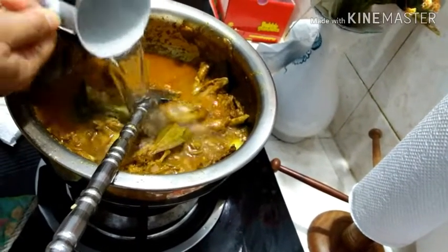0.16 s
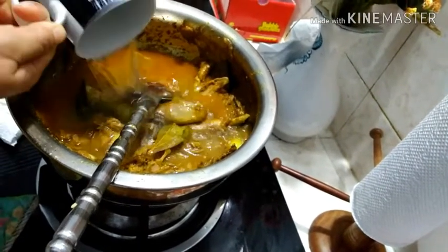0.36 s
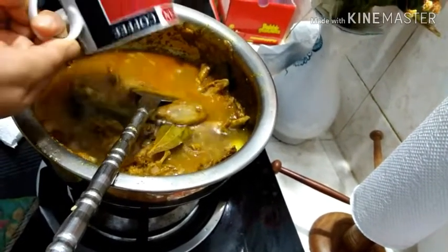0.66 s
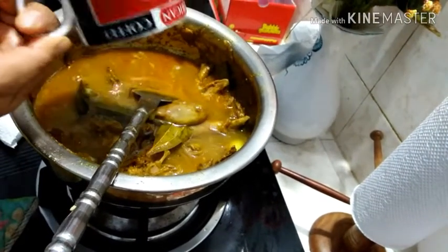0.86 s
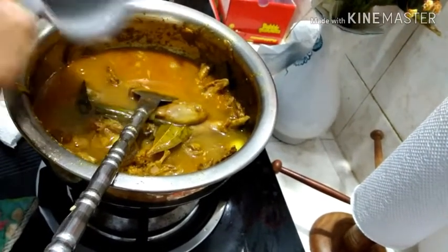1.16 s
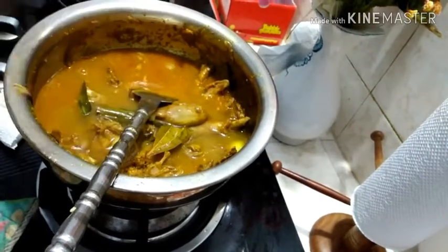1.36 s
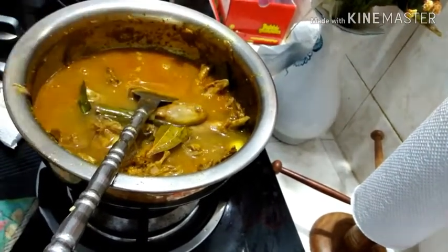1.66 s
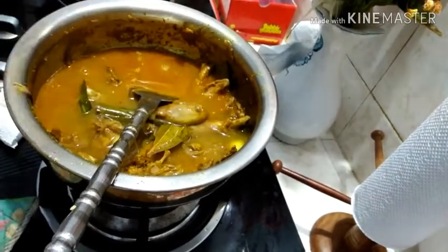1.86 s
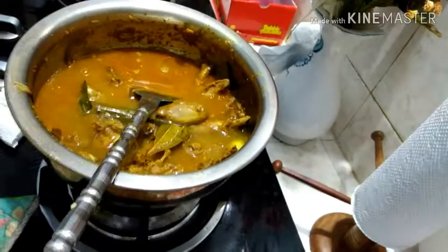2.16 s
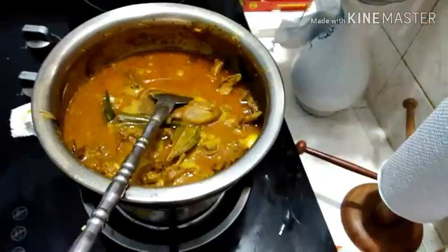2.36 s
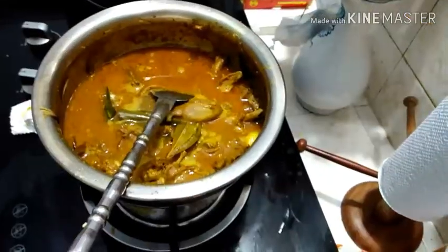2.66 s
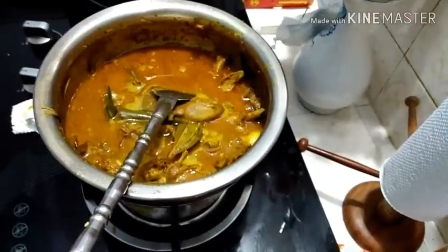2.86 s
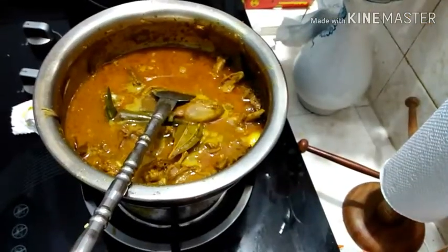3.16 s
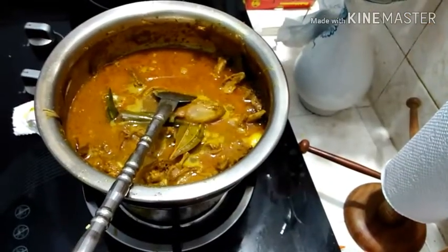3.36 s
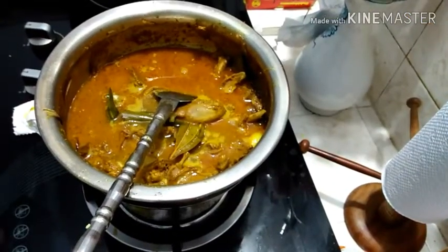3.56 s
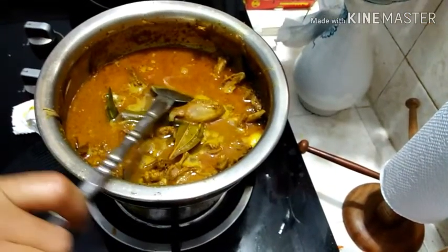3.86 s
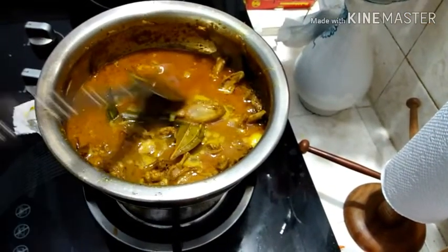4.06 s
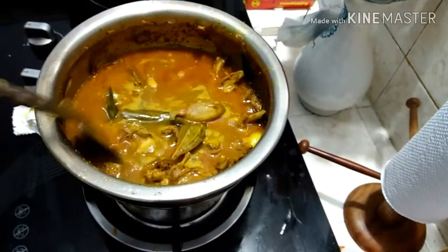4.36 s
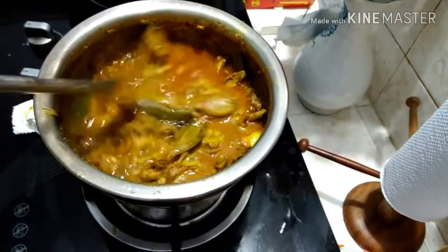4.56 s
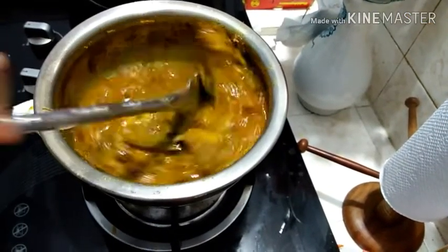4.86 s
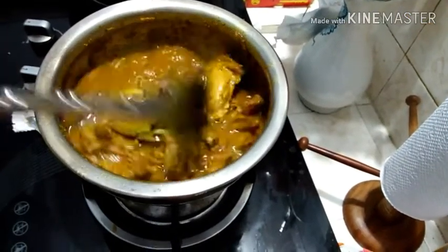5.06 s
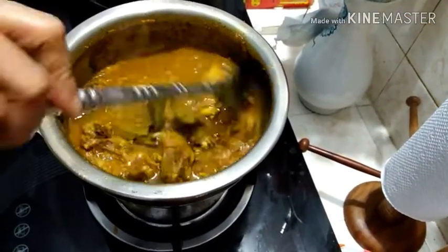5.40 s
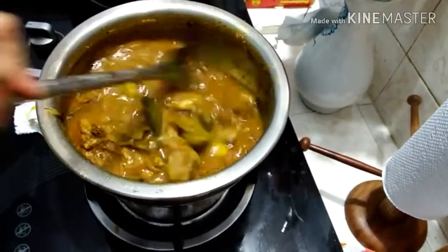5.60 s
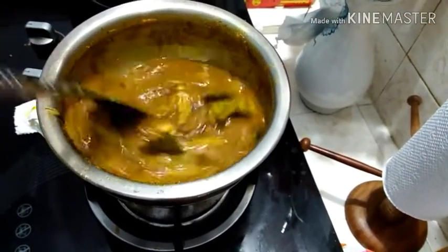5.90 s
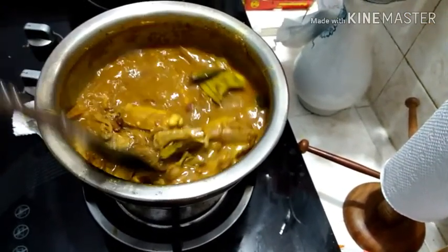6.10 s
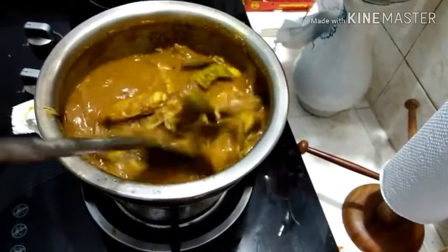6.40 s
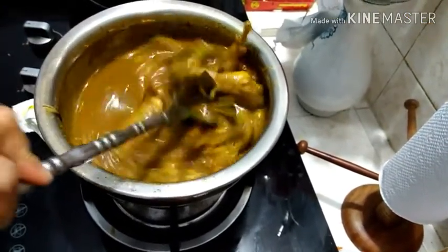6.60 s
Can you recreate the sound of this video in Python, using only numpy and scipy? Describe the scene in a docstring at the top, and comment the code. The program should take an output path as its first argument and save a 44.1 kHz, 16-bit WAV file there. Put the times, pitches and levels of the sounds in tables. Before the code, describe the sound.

Close by a stove in a tiled kitchen with a short dense echo. From 0 to about 1.2 s water pours into a full pot, a swarm of small ringing bubbles with a few bright plops near 0.1 and 0.3 s, thinning out. Underneath, a soft burner rush with hollow tones and a fluttering low drone, strongest around 2 s, plus a faint simmer. Dry, crisp bristle swishes run throughout, with sharper flicks near 0.5, 1.8, 2.6 and 3.8 s. At 4.1 s the spatula scrapes faintly; at 4.7 s it knocks hard, with a bright crack and hollow boom. Dull wet shoves follow, notably at 5.1 s. At 5.53 s comes the loudest event, a rattling steel clang with a low thump and a shimmering ring of under half a second. Another shove at 5.8 s, a bubble at 6.1 s, paired flicks at 6.2 s, and a lighter metallic knock at 6.4 s.

```python
"""A long metal spatula shoves the meat about in a steel pot of curry, knocks on it twice and clangs once.
The blade excites the filled pot; blows add a bright crack, a short ring and a shimmer from the wall.
Before most of this, a mug of hot water is poured in: swarms of ringing air bubbles.
The burner is shaped noise. Ticking bristles make a dry swish that comes and goes, like a stiff broom.
A dense echo tail places the pot in a tiled kitchen."""
import sys
import numpy as np
from scipy import signal
from scipy.fft import rfft, irfft
from scipy.io import wavfile

SR = 44100
rng = np.random.default_rng(int(sys.argv[2]) if len(sys.argv) > 2 else 0)


def transcribe(signal):
    """Save signal, clipped to [-1, 1], as a 16-bit WAV file at the path in sys.argv[1]."""
    frames = np.atleast_2d(signal).T
    limited = np.clip(frames, -1, 1)
    pcm = np.round(limited * 32767).astype(np.int16)
    wavfile.write(sys.argv[1], SR, pcm)


N = 297234
TIME = np.arange(N) / SR


def amp(db):
    """Decibels to gain."""
    return 10 ** (np.asarray(db) / 20)


def evened(x):
    """Scales x to an average strength (rms) of one."""
    return x / np.sqrt(np.mean(x ** 2) + 1e-20)


def read(points, hz):
    """Reads a table on a logarithmic frequency axis."""
    f, value = np.transpose(points)
    return np.interp(np.log(hz + 1), np.log(f + 1), value)


def curve(rows):
    """Joins (time, value) rows by straight lines."""
    return np.interp(TIME, *np.transpose(rows))


def add(mix, s, sound):
    """Lays a sound into the mix at time s."""
    part = mix[max(round(s * SR), 0):][:len(sound)]
    part += sound[:len(part)]


def colour(x, spectrum):
    """Makes some pitches of x stronger than others, then sets its rms to one."""
    hz = np.fft.rfftfreq(len(x), 1 / SR)
    gain = amp(read(spectrum, hz))
    return evened(irfft(rfft(x) * gain, len(x)))


def resonate(x, peaks):
    """Passes x through resonances, then sets its rms to one; only differences between their dB count."""
    hz = np.fft.rfftfreq(len(x), 1 / SR)
    # each gain falls to half of its peak one width away from its centre
    gain = sum(amp(db) / (1 + ((hz - f) / width) ** 2) for f, width, db in peaks)
    return evened(irfft(rfft(x) * gain, len(x)))


def grains(per_s, spread_db):
    """Random tiny impacts, a few of them large."""
    size = amp(spread_db * np.minimum(rng.exponential(1, N), 4))
    signed = size * rng.choice([-1, 1], N)
    return evened(signed * (rng.random(N) < per_s / SR))


def flutter(rate_hz, depth_db):
    """A gain that wanders at random, around rate_hz and by depth_db (rms)."""
    wander = resonate(rng.standard_normal(N), [(rate_hz, rate_hz / 2, 0)])
    return amp(depth_db * wander)


def burst(s, rise, fade):
    """An envelope that swells at time s and dies away; rise and fade are time constants in s."""
    age = np.maximum(TIME - s, 0)
    return (1 - np.exp(-age / rise)) * np.exp(-age / fade)


def dying(x, t60s):
    """Lets each band of x die at its own speed; t60 is the time to fall by 60 dB."""
    hz, t, bands = signal.stft(x, SR, nperseg=256)
    decay = amp(-60 * t / read(t60s, hz)[:, None])
    return signal.istft(bands * decay, SR, nperseg=256)[1][:len(x)]


def ring(modes, rise, beat_share=0):
    """Many pitches ring and die away, starting near an rms of one; each may waver in strength."""
    t = TIME[:SR]
    hz, db, t60 = np.transpose(modes)[:, :, None]
    # each pitch swells and sinks 12 to 30 times a second, as if beating against a close twin
    beats = 1 + beat_share * np.cos(2 * np.pi * rng.uniform(12, 30, hz.shape) * t)
    waves = np.sin(2 * np.pi * (hz * t + rng.random(hz.shape)))
    partials = beats * amp(db - 60 * t / t60) * waves
    return partials.sum(0) * (1 - np.exp(-t / rise)) / np.sqrt(np.sum(amp(db) ** 2) / 2)


# how long the room's echo lasts: f/Hz, t60/s
ROOM_T60 = [(150, 0.36), (1000, 0.51), (4000, 0.53), (9000, 0.31), (14000, 0.11)]


def kitchen(x, wet_db):
    """Tiles throw back a dense tail, which starts after 5 ms."""
    fade_in = np.clip(TIME[:SR] / 0.005 - 1, 0, 1)
    tail = dying(rng.standard_normal(SR), ROOM_T60) * fade_in
    return x + amp(wet_db) * signal.fftconvolve(x, tail / np.linalg.norm(tail))[:N]


# level of the soft rush and of the hollow tones: t/s, level/dB
RUSH_AND_HOLLOW_LEVEL = [(0, -2), (1.4, 5), (2.3, 4.5), (2.7, -4.5), (3.3, 1), (4.5, 3.5), (5.4, -0.5),
                         (6.73, -0.5)]
# spectrum of the rush: f/Hz, level/dB per Hz
RUSH_SPECTRUM = [(25, -5), (55, -15), (110, 4), (200, 1.5), (370, -35), (520, -14), (850, -21), (1500, -4),
                 (2300, -9), (2950, -12.5), (4200, -16), (6000, -9), (8500, 0), (14000, -15.5)]
# air resonances round the pot: f/Hz, width/Hz, level/dB
HOLLOW_TONES = [(271.4, 7.1, 6), (296, 30, -2), (421, 14, -2), (474, 6, -1), (600, 13, 0), (817, 220, -0.5),
                (2184, 360, -3)]
# the flame's low drone, before its flutter: t/s, level/dB
DRONE_LEVEL = [(0, -67.5), (1.0, -57), (1.8, -51.5), (2.35, -49), (2.65, -62.5), (4.5, -59), (5.6, -67),
               (6.73, -65.5)]
# the flame's low rumble, before its flutter: t/s, level/dB
RUMBLE_LEVEL = [(0, -66.5), (1.8, -69.5), (2.3, -57.5), (2.7, -63.5), (5.7, -63), (6.1, -68)]


def burner(rush_db=-60, hollow_db=-63, rush_share=0.5):
    """The flame rushes softly and stirs the air round the pot; its drone and rumble flutter."""
    level_db = curve(RUSH_AND_HOLLOW_LEVEL)
    # the rush follows only a share of this level curve in dB
    rush = amp(rush_db + rush_share * level_db) * colour(rng.standard_normal(N), RUSH_SPECTRUM)
    hollows = amp(hollow_db + level_db) * resonate(rng.standard_normal(N), HOLLOW_TONES)
    drone = amp(curve(DRONE_LEVEL)) * resonate(rng.standard_normal(N), [(135.2, 8.5, 0)])
    low_air = resonate(rng.standard_normal(N), [(69.3, 9.6, 22), (98, 11, 12.0)])
    rumble = amp(curve(RUMBLE_LEVEL)) * low_air
    return rush + hollows + (rumble + drone) * flutter(rate_hz=6.7, depth_db=3.0)


def stroke(start, length, attack, release_db_per_s):
    """An envelope that rises, holds until its length is over and dies away."""
    age = TIME - start
    return np.clip(age / attack, 0, 1) * amp(-release_db_per_s * np.maximum(age - length, 0))


# light drags of the broom: start t/s, length/s, level at the start/dB, level at the end/dB
LIGHT_DRAGS = [(-.05, 0.44, -43, -41), (.8, .13, -51, -55), (0.943, 0.7, -49, -60),
               (1.51, 0.19, -45.5, -38.5), (2.186, 0.34, -51.5, -42), (2.835, 0.29, -51, -44.5),
               (3.11, 0.21, -55, -49.5), (3.36, 0.34, -43.5, -42), (4.081, 0.71, -46, -52),
               (4.72, 0.3, -36, -40), (5.271, 0.23, -53, -45), (5.732, 0.32, -46, -38),
               (6.063, 0.14, -52, -43), (6.426, 0.36, -49, -49.5)]
DRAG_ATTACK_S, DRAG_RELEASE_DB_PER_S = 0.022, 103
# quick flicks, many of them in pairs: t/s at full force, level/dB
QUICK_FLICKS = [(0.505, -32), (0.602, -32.5), (1.66, -39), (1.773, -34), (1.868, -36), (2.58, -31),
                (2.626, -29), (3.612, -34.5), (3.76, -31), (3.806, -29), (5.026, -29), (5.915, -41.5),
                (6.205, -32.5), (6.254, -32)]
FLICK_ATTACK_S, FLICK_HOLD_S, FLICK_RELEASE_DB_PER_S = 0.027, 0.0027, 151


def sweeping():
    """Level of the broom in dB: slow drags that press harder or ease off, and quick flicks."""
    power = np.zeros(N) + 1e-9
    for s, length, first_db, last_db in LIGHT_DRAGS:
        pressure = amp(curve([(s, first_db), (s + length, last_db)]))
        drag = stroke(s, length, DRAG_ATTACK_S, DRAG_RELEASE_DB_PER_S)
        power += (pressure * drag) ** 2
    for s, db in QUICK_FLICKS:
        flick = stroke(s - FLICK_ATTACK_S, FLICK_ATTACK_S + FLICK_HOLD_S,
                       FLICK_ATTACK_S, FLICK_RELEASE_DB_PER_S)
        power += (amp(db) * flick) ** 2
    return 10 * np.log10(power)


# spectrum of bristles dragged lightly: f/Hz, level/dB per Hz
DRAG_SPECTRUM = [(2000, -57), (2900, -21), (3450, -12), (4150, -27), (4900, -13.5), (6400, -12), (7500, -1),
                 (8450, 7), (9600, 0.5), (11000, -2), (12700, -10), (14200, -8.5)]
# spectrum of bristles flicked hard, also used for the snaps: f/Hz, level/dB per Hz
FLICK_SPECTRUM = [(500, -95), (1000, -25), (1270, -12), (1650, -29.5), (2700, -16), (3000, -25),
                  (3450, -12.5), (4100, -30.5), (4900, -13), (6400, -11.5), (8400, 1), (9800, -3),
                  (11100, 1.5), (14000, -9)]


def broom(light_db=-49, hard_db=-32):
    """Bristles tick unevenly over the floor; the harder the stroke, the wider its spectrum."""
    level_db = sweeping()
    # 0 is a light stroke, 1 a hard one
    force = np.clip((level_db - light_db) / (hard_db - light_db), 0, 1)
    light = colour(grains(per_s=14000, spread_db=3.5), DRAG_SPECTRUM)
    light = light * flutter(rate_hz=13, depth_db=2.0)
    hard = colour(grains(per_s=20000, spread_db=3.0), FLICK_SPECTRUM)
    return amp(level_db) * (np.sqrt(1 - force) * light + np.sqrt(force) * hard)


# bristles landing or snapping: t/s, level/dB
BRISTLE_SNAPS = [(.071, -33), (0.163, -27), (.184, -32), (.494, -31), (0.8167, -38), (1.526, -39),
                 (1.856, -27), (2.446, -33), (2.573, -26), (3.368, -33), (3.378, -30), (3.612, -31),
                 (6.190, -31)]


def snaps():
    """Single stiff bristles slap the floor: very short bursts of noise."""
    slaps = sum(amp(db) * burst(s, rise=.0002, fade=.004) for s, db in BRISTLE_SNAPS)
    return slaps * colour(rng.standard_normal(N), FLICK_SPECTRUM)


def bubble(hz, t60, glide=0.011):
    """A trapped pocket of air rings, rising a little in pitch as it nears the surface."""
    t = TIME[:SR // 8]
    wave = np.sin(2 * np.pi * hz * t * (1 + glide * t / t60))
    return (1 - np.exp(-hz * t)) * amp(-60 * t / t60) * wave


def swarm(centre_hz, spread, per_s, t60):
    """Many bubbles with pitches scattered round a centre, at random times; rms of one."""
    pitches = centre_hz * np.exp(spread * np.linspace(-1, 1, num=32))
    out = np.zeros(N)
    for hz in pitches:
        pop = bubble(hz, t60)
        for s, size, sign in rng.random((round(per_s * N / SR / len(pitches)), 3)):
            # the power makes a few bubbles much louder than the rest
            strength = np.sign(sign - .5) * (size + .02) ** -.4
            add(out, s * N / SR, strength * pop)
    return evened(out)


# the stream from the mug: t/s, level/dB
POUR_LEVEL = [(0, -55), (.33, -54), (.45, -59), (.95, -68), (1.3, -100)]
# single air bubbles that stand out: t/s, level/dB, f/Hz, t60/s
SINGLE_BUBBLES = [(.031, -40, 2980, 0.024), (0.068, -42, 3030, 0.054), (.123, -33, 902, 0.039),
                  (0.167, -36, 3090, .03), (.184, -41, 2960, .03), (.226, -42, 900, 0.025),
                  (0.281, -26, 2400, 0.016), (0.288, -31, 2670, 0.026), (.346, -41.5, 750, .03),
                  (5.078, -42, 1830, 0.018), (6.11, -32.5, 1360, 0.017)]


def water(large_db=-4, simmer_db=-62):
    """The stream whips up small and large bubbles, a few standing out; the gravy simmers throughout."""
    small = swarm(2750, spread=.14, per_s=320, t60=.016)
    large = swarm(1100, spread=.5, per_s=120, t60=.02)
    simmer = swarm(1300, spread=.62, per_s=600, t60=.03)
    stream = amp(curve(POUR_LEVEL)) * evened(small + amp(large_db) * large)
    out = stream + amp(simmer_db) * simmer
    for s, db, hz, t60 in SINGLE_BUBBLES:
        add(out, s, amp(db) * bubble(hz, t60))
    return out


# hard blows set the whole wall ringing: t/s, level/dB
WALL_CLANGS = [(4.719, -53), (5.537, -11), (6.421, -56)]
# ringing pitches of the pot's wall: f/Hz, level/dB, t60/s
WALL_MODES = [(2042, -14, .42), (2115, -17, .45), (2226, -11, .45), (2999, -3.5, .33), (3020, -8, .35),
              (3130, -9, .35), (3160, -8, .32), (3535, -7, .18), (3560, 2, .26), (3816, -20, .48),
              (4059, -21, .48), (4186, -19, .45), (4888, -14, .3), (4909, -6, .35), (5626, -17, .42),
              (5823, -12, .26), (6352, -7, .34), (6551, -11, .26), (7094, -7, .27), (7800, -13, .39),
              (7940, -7, .28), (8932, -5, .36), (9093, -9, .35), (9129, -7, .32), (9499, -7, .22),
              (9523, -3, .27), (9648, -14, .48), (9738, -14, .48), (10672, -8, .25), (11360, -14, .36),
              (12723, -7, .26), (13780, -16, .25)]
# the pot rocks on its stand, or its bottom booms under the blade: t/s, level/dB, f/Hz, t60/s
POT_THUMPS = [(2.444, -39, 53, 0.17), (4.728, -32, 461, 0.18), (4.735, -37.5, 693, 0.6),
              (5.527, -29, 70, 0.061), (5.529, -24.5, 243, 0.028), (5.774, -46, 265, 0.16)]


def pot():
    """The wall rings on after hard blows; the whole pot bumps and booms as dying low tones."""
    out, t = np.zeros(N), TIME[:SR]
    wall = ring(WALL_MODES, rise=.009, beat_share=.55)
    for s, db in WALL_CLANGS:
        add(out, s, amp(db) * wall)
    for s, db, hz, t60 in POT_THUMPS:
        tone = np.sin(2 * np.pi * hz * t) * (1 - np.exp(-hz * t))
        add(out, s, amp(db - 60 * t / t60) * tone)
    return out


# the spatula shoves meat and gravy: t/s, level/dB, fade/s, level of the blade's scrape/dB
SPATULA_SHOVES = [(.123, -52.5, 0.021, -40.5), (4.086, -70, 0.048, -45.5), (4.115, -58, 0.017, -38),
                  (4.56, -57, 0.57, -75), (4.721, -38, 0.06, -67), (4.97, -53.5, 0.23, -76),
                  (5.084, -34.5, 0.027, -45), (5.475, -46.5, 0.037, -58), (5.536, -38, 0.043, -60),
                  (5.775, -61, 0.099, -58), (5.842, -43, 0.045, -79)]
# the filled pot's dull resonances: f/Hz, width/Hz, level/dB
POT_BELLY = [(132, 29, -8), (262, 46, -14), (305, 14, -0.5), (430, 27, -5.5), (600, 25, -3), (732, 47, 2.5),
             (760, 40, -39), (900, 40, -22), (1070, 130, -11.5), (1350, 130, -19), (1560, 33, -29)]


def stirring():
    """The blade judders over the bottom: the filled pot rumbles and the blade rasps."""
    judder = grains(per_s=700, spread_db=3.3)
    rumble = resonate(judder, POT_BELLY)
    rasp = resonate(judder, [(1490, 670, -11.5), (2070, 44, 2), (2400, 190, -10)])
    out = np.zeros(N)
    for s, db, fade, scrape_db in SPATULA_SHOVES:
        shove = amp(db) * rumble + amp(scrape_db) * rasp
        out += burst(s, rise=0.0058, fade=fade) * shove
    return out


# spectrum of the wall's countless weaker modes: f/Hz, level/dB per Hz
SHIMMER_SPECTRUM = [(600, -21), (1000, -7), (1750, -13), (2300, -5.5), (3500, -0.5), (5200, -10.5),
                    (6200, 4), (9500, 1.5), (10100, 1), (11000, 5.5), (13200, 6), (14300, -17)]
# how long they ring: f/Hz, t60/s
SHIMMER_DECAY = [(1000, 0.4), (6000, 0.35), (9500, 0.55), (11000, 0.31), (14000, 0.3)]


def shimmer():
    """The wall's many weak modes, scattered at random over the whole range."""
    present, phase = rng.random((2, SR // 2 + 1))
    # about 6 in 100 of the lines, which lie 1 Hz apart, sound
    lines = irfft((present < .06) * np.exp(2j * np.pi * phase), SR)
    rise = 1 - np.exp(-TIME[:SR] / 0.0021)
    return dying(colour(lines, SHIMMER_SPECTRUM), SHIMMER_DECAY) * rise


# steel meets steel: t/s, contact tick level/dB, spatula ring level/dB, wall shimmer level/dB
STEEL_BLOWS = [(.123, -58, -37, -66), (4.7179, -12.5, -15, -31), (4.7235, -23, -22, -48),
               (4.8315, -29, -48, -58), (5.5289, -20, -33, -40), (5.5324, -22, -36, -45),
               (5.5356, -5.5, -25, -17), (5.5395, -9.5, -26, -17), (5.5510, -18, -30, -20.5),
               (6.403, -39, -55, -72), (6.4203, -29, -24.5, -51), (6.4325, -29, -37, -53)]
# spectrum of the contact tick: f/Hz, level/dB per Hz
TICK_SPECTRUM = [(200, -26), (1500, -20), (4500, -50), (6800, -18), (8200, -2), (9500, 2), (10500, -4),
                 (14000, -8.5)]
# ringing pitches of the hand-held spatula: f/Hz, level/dB, t60/s
SPATULA_MODES = [(2005, -7, .035), (2078, 0, .028), (2200, -6, .035), (3050, -18, .09), (4750, -23, .05),
                 (6330, -15, .06), (8000, -6, .05), (8500, -6, .04), (8950, -6, .05), (9180, -6, .06),
                 (9560, -4, .035), (10250, -10, .05), (11700, -14, .05), (12700, -13, .04)]


def clanks():
    """Each blow is a bright crack and rattle, the short ring of the spatula and a shimmer from the wall."""
    out, t = np.zeros(N), TIME[:SR]
    crack, rattle = np.exp(-t / .0006), np.exp(-t / .0045)
    contact = (crack + rattle) * (1 - np.exp(-t / .00015))
    for s, tick_db, spatula_db, shimmer_db in STEEL_BLOWS:
        tick = colour(rng.standard_normal(SR), TICK_SPECTRUM) * contact
        add(out, s, amp(tick_db) * tick)
        add(out, s, amp(spatula_db) * ring(SPATULA_MODES, rise=0.00042))
        add(out, s, amp(shimmer_db) * shimmer())
    return out


def scene():
    """The pot and the bristle snaps in the room, over the burner and the sweeping without echo."""
    background = burner() + broom()
    sharp = kitchen(clanks() + snaps(), wet_db=-9)
    wet = kitchen(water() + stirring(), wet_db=-11.5)
    ringing = kitchen(pot(), wet_db=-15)
    return (background + sharp + wet + ringing)[None]


EDGE_HZ = 14280  # upper limit of the sound


def record(dry):
    """The microphone rounds off the loudest peaks; then a filter removes what lies above the edge."""
    rounded = np.tanh(dry)
    lowpass = signal.firwin(511, EDGE_HZ, window=("kaiser", 9), fs=SR)
    return signal.oaconvolve(rounded, lowpass[None], "same")


dry = scene()
out = record(dry)
transcribe(out)
```